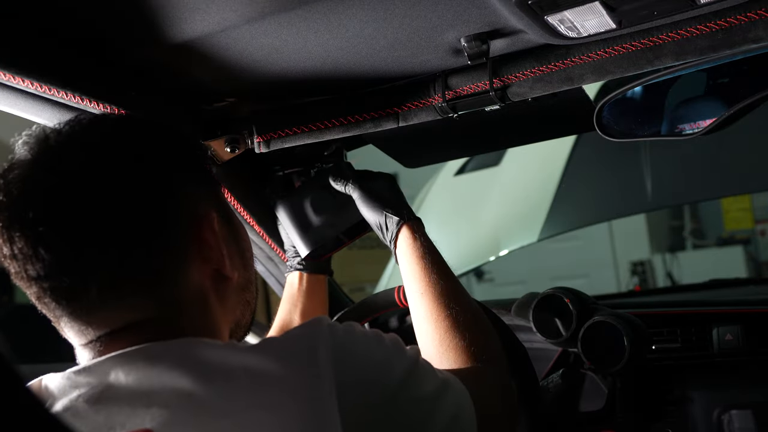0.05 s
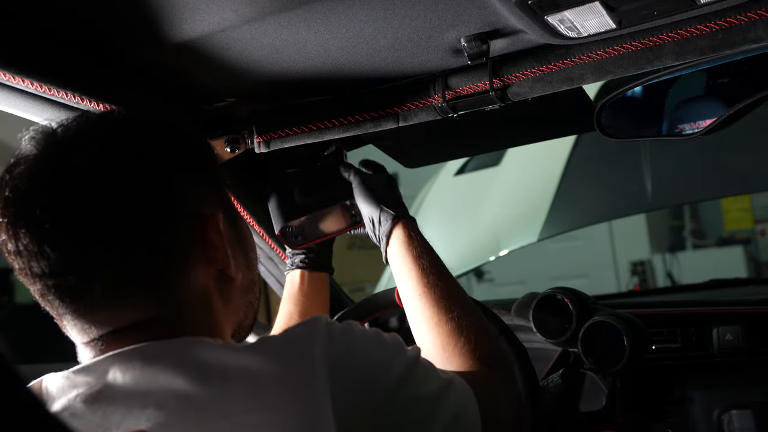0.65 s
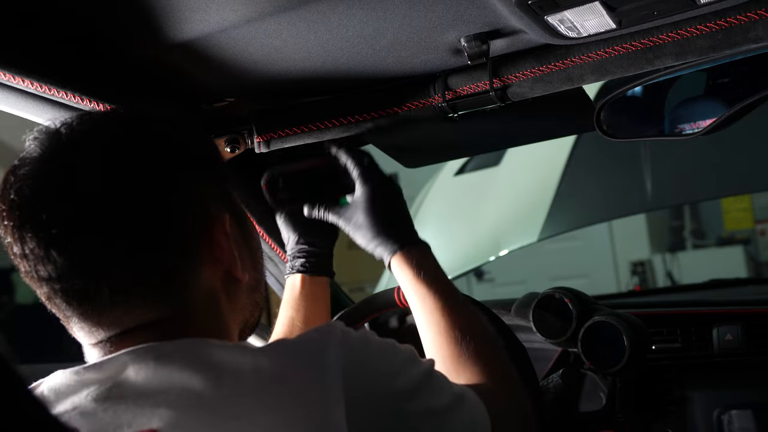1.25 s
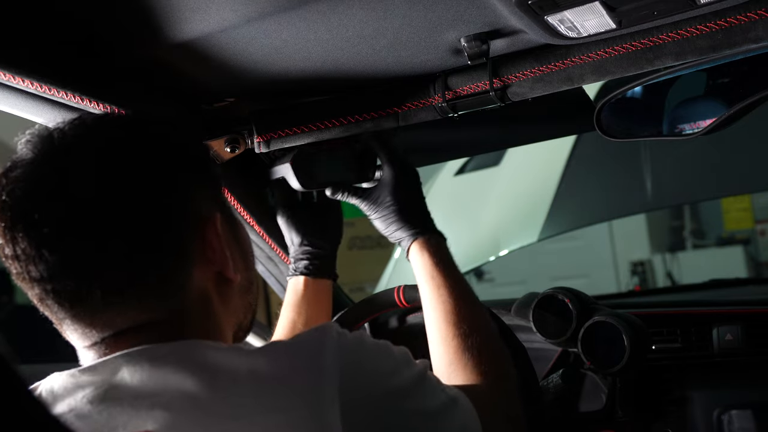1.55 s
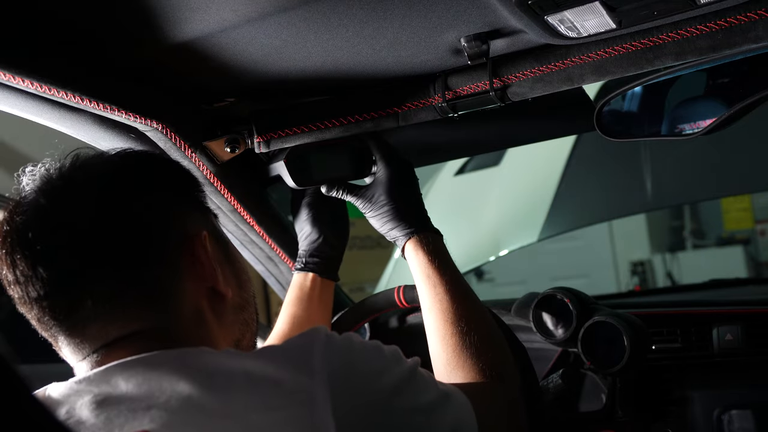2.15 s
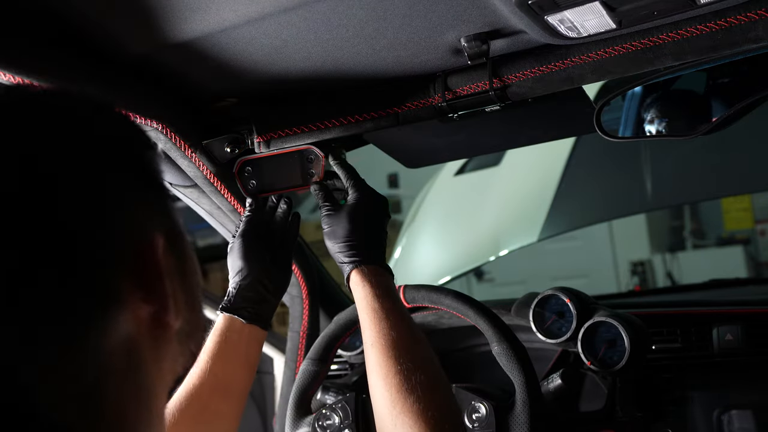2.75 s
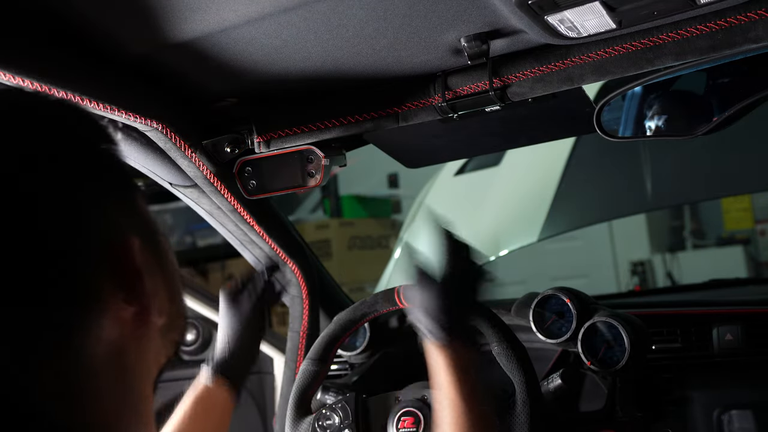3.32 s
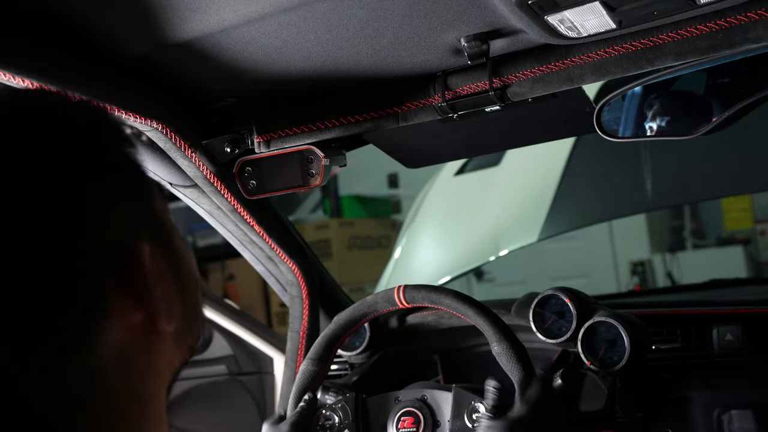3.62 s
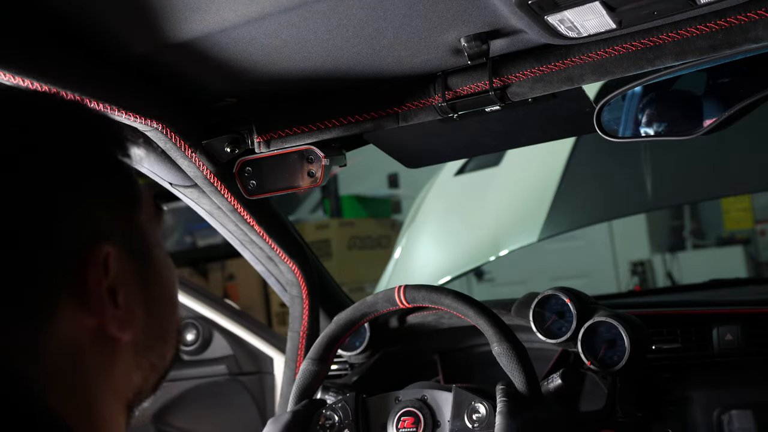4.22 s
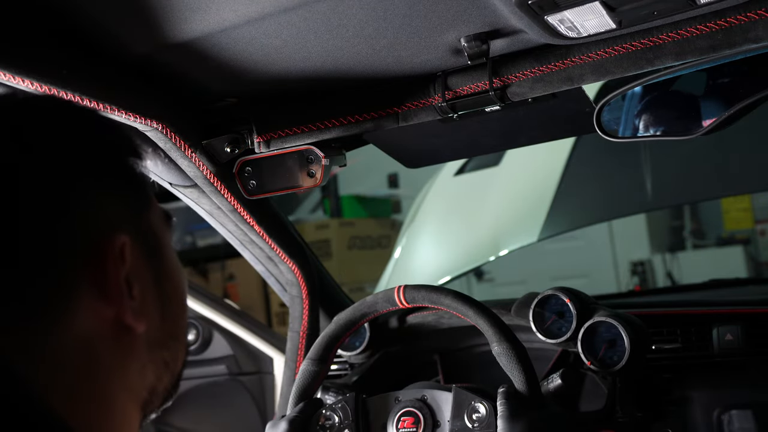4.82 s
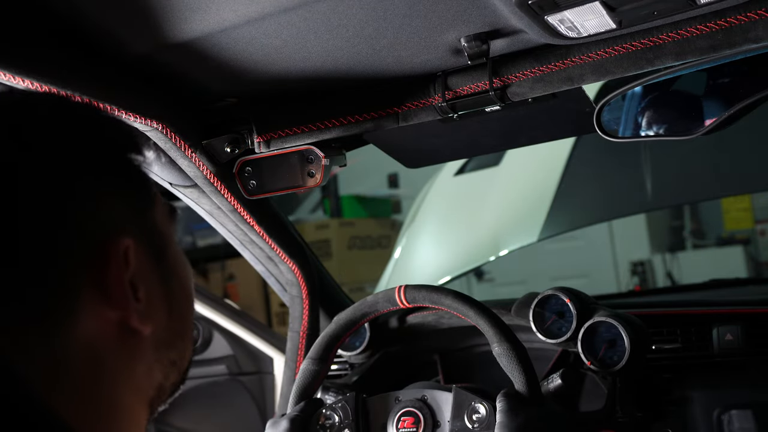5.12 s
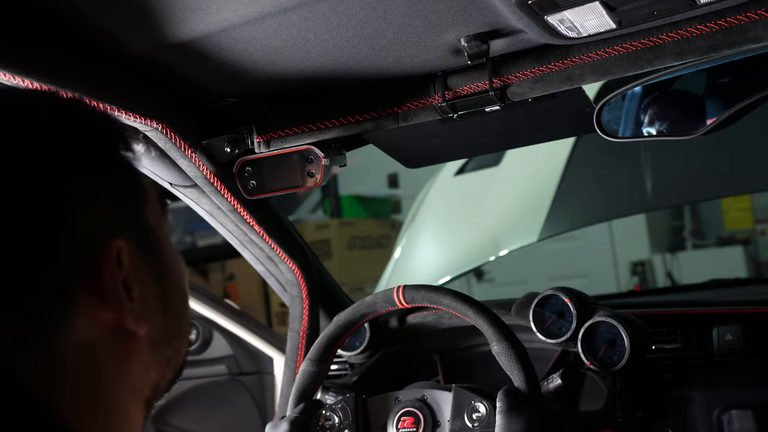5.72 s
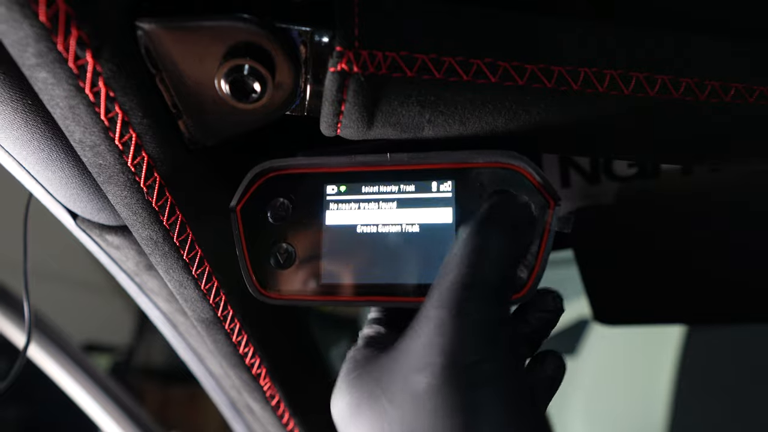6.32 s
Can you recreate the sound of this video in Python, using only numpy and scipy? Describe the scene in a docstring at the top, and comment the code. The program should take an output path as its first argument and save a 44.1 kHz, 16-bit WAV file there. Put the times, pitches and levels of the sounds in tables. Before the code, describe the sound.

Inside a quiet parked car, gloved hands work a small plastic device into a mount on a padded metal bar, with close, light clicks and dull thumps. It seats with a loud, boomy double knock. Sleeves swish faintly, and the hands land on the steering wheel and slide along it with small snaps and faint squeaks. Near the end a button clicks sharply.

```python
"""Inside a quiet parked car, gloved hands work a small timer into its mount on a padded metal bar.
The bar thumps and the plastic case clicks; just after 2 seconds it seats with a double knock
that makes the cabin air boom. At about 3.5 seconds sleeves swish and the hands drop to the
steering wheel, then slide on it with small snaps and faint squeaks.
Just after 6 seconds a button is pressed and clicks."""
import sys
import numpy as np
from scipy import signal
from scipy.fft import rfft, irfft, next_fast_len
from scipy.io import wavfile
from scipy.ndimage import uniform_filter1d

SR = 44100
rng = np.random.default_rng(int(sys.argv[2]) if len(sys.argv) > 2 else 0)


def inscribe(sig):
    """Save sig as 16-bit PCM at rate SR to the path in sys.argv[1].

    A 1-D sig is mono; a 2-D sig holds one channel per row.
    Samples are clipped to [-1, 1] before scaling.
    """
    pcm = np.round(np.clip(np.atleast_2d(sig).T, -1, 1) * 32767)
    wavfile.write(sys.argv[1], SR, pcm.astype(np.int16))


N = 280917
HIT_T = np.arange(SR // 2) / SR   # the clock of a single blow, in seconds
LAND_S = 3.585   # the hands reach the wheel

# Pushes on the mount, bar and wheel. Each row: start in seconds, relative bar level in dB,
# relative cabin boom level in dB, hardness in Hz (higher sounds brighter).
PUSHES = [(0.072, -46.5, -58, 347), (0.1616, -29.5, -55, 208), (0.187, -44, -48, 330),
          (0.197, -39, -49, 530), (0.283, -48, -59, 276), (0.365, -37.5, -45, 302),
          (0.376, -34.5, -47, 406), (0.395, -31, -43, 210), (0.510, -36, -65, 162),
          (0.544, -42, -52, 220.5), (0.709, -26.5, -42, 245), (0.7631, -27.5, -55, 497),
          (0.821, -44, -48, 218), (0.995, -32, -39.5, 188), (1.2228, -34.5, -47, 490),
          (1.238, -36.5, -49, 330), (1.383, -44, -48.5, 634), (1.502, -45.5, -43.5, 352),
          (1.571, -49, -61, 300), (1.682, -42.5, -43.5, 330), (1.749, -54, -67, 462), (2.09, -36, -46, 387),
          (2.108, -36, -29.5, 340), (2.172, -31, -22.5, 247), (2.184, -17.5, -53, 218),
          (2.2256, -24, -20, 330), (2.252, -19.5, -48, 252), (2.449, -46, -41, 280), (2.607, -50, -79, 240),
          (2.823, -50.5, -65, 192), (3.566, -52, -33, 380), (6.198, -43, -45.5, 262),
          (6.355, -34.5, -56, 336)]
# Heavy, soft bumps. Each row: start in seconds, first level in dB, seconds between rebounds,
# loss per rebound in dB.
SOFT_BUMPS = [(1.026, -41.5, 0.087, 0.5), (1.80, -46.5, 0.12, 1), (2.2386, -15.5, .152, 15),
              (3.63, -25, 0.092, 6), (4.262, -40, .063, 5), (6.011, -41, .068, 1.5)]
# Contacts that ring one note of the mount, case or wheel. Each row: start in seconds, level in dB,
# pitch in Hz, seconds to fade by 60 dB.
RINGING_CONTACTS = [(0.710, -28.5, 131.3, 0.34), (0.868, -44.5, 2700, 0.017), (1.221, -47, 3150, 0.052),
                    (2.108, -57.5, 2300, 0.076), (1.224, -31, 171.5, 0.09), (1.239, -28, 258, 0.033),
                    (2.1736, -23, 347, 0.029), (2.2257, -19.5, 325, 0.051), (2.227, -31.5, 532, 0.1),
                    (2.226, -40, 1385, 0.066), (4.171, -32.5, 168, 0.073), (4.238, -33.5, 426, 0.069),
                    (6.352, -55, 2590, 0.05)]
# The plastic case catching on the mount. Each row: start in seconds, level in dB, brightness in Hz,
# rattle length in seconds.
CASE_CATCHES = [(0.191, -50, 2370, 0.014), (0.373, -44.5, 6250, 0.0068), (0.411, -54.5, 5500, 0.0025),
                (0.752, -53, 8950, 0.00092), (0.762, -40.5, 4170, 0.0076), (0.8685, -44.5, 15000, 0.0017),
                (1.22, -44, 8500, 0.016), (1.2715, -47, 7500, 0.0033), (1.292, -57.5, 7000, 0.0036),
                (1.38, -42, 11100, 0.0096), (2.087, -59.5, 8260, 0.005), (2.105, -44.5, 10300, 0.012),
                (2.174, -48, 6040, 0.015), (2.179, -43.5, 15000, 0.013), (2.227, -42.5, 8750, 0.024),
                (2.244, -47, 15000, 0.006)]
# The grip snapping on the wheel, and a fingertip on the case. Each row: start in seconds,
# relative level of the hollow knock in dB, relative level of the sharp tick in dB.
GRIP_SNAPS = [(3.894, -60, -42), (3.9476, -30.5, -27.5), (3.959, -33.5, -36), (4.009, -24.5, -51),
              (4.038, -34.5, -37.5), (4.108, -31.5, -31.5), (4.167, -28.5, -29.5), (4.173, -28, -47),
              (4.233, -25.5, -28), (4.956, -57, -51), (6.350, -29, -70)]
# Small taps in the cabin. Each row: start in seconds, level in dB, brightness in Hz.
CABIN_TAPS = [(3.894, -39, 1320), (4.010, -34, 900), (4.437, -49, 1500), (4.953, -39, 1730),
              (4.961, -44.5, 1290), (5.245, -57, 760)]
# A rubber glove squeaking on the case. Each row: middle in seconds, relative level in dB,
# pitch in Hz, speed of the flutter in Hz, fade time on either side in seconds.
CASE_SQUEAKS = [(0.379, -49, 12100, 200, .008), (0.870, -52, 11000, 500, .004),
                (0.928, -49.5, 15200, 900, .016)]
# The gloves shifting their grip. Each row: loudest moment in seconds, relative level in dB.
GRIP_SHIFTS = [(0.06, -68), (0.17, -68), (0.25, -75), (0.4, -57), (0.775, -54), (0.9, -55.5), (1.29, -58.5),
               (1.41, -54.5), (1.96, -70), (2.24, -63)]
# Sleeves swishing as the arms drop. Each row: loudest moment in seconds, level in dB,
# rise in dB per second, fall in dB per second.
SLEEVE_SWISHES = [(3.41, -55.5, 81, 61), (3.573, -54, 404, 236), (3.88, -67, 83, 44)]
# A glove catching on the rim. Each row: time it reaches full level in seconds, relative level in dB,
# pitch in Hz, width in Hz, hold time in seconds.
RIM_SQUEAKS = [(3.573, -57, 1800, 260, 0.034), (3.735, -63, 2650, 300, 0.044),
               (4.75, -61.5, 1097, 45, 0.022), (4.854, -59.5, 1100, 50, 0.032),
               (4.822, -69, 1628, 45, 0.042), (4.98, -62, 1088, 60, 0.076), (5.14, -68.5, 2950, 910, 0.024),
               (5.18, -68.5, 1080, 70, 0.027)]

# Modes are the notes a thing rings at. Each row: pitch in Hz, width in Hz (wider dies sooner),
# relative level in dB.
BAR_MODES = [(132.3, 6.2, 7.5), (161.6, 33, -0.5), (188.2, 20.7, 2.5), (232.6, 15.4, -4.5),
             (257.5, 42, -23.5), (325.6, 9.4, -3.5), (387.3, 8.5, -6)]
BRACKET_MODES = [(367, 26, -1), (497, 50, -2), (654, 64, -1.5), (731, 23, -7.5), (856, 29, 0.5),
                 (1100, 100, -15.5), (1442, 22, 3)]
CABIN_AIR_MODES = [(54.8, 11.7, 12), (40.7, 21, -27), (96.5, 32, -2.5)]
CASE_MODES = [(737, 89, 8), (1417, 230, 0), (2020, 230, 5.5), (2700, 440, 3.5), (3220, 880, 1.5),
              (4550, 2700, -5.5), (7400, 1500, -2), (11100, 1100, -1), (15000, 680, 0)]
BUTTON_MODES = [(835, 78, -3), (1720, 550, -17), (2536, 46, 6), (3210, 92, 4.5), (3800, 180, 2),
                (4060, 210, 4), (4600, 410, 4), (4980, 220, 0), (5170, 200, -1), (5980, 180, 6),
                (7300, 400, -3), (8000, 280, -3), (8450, 360, -11), (10300, 700, -10), (11100, 520, -15),
                (14900, 2200, -24)]
HOLLOW_KNOCK_MODES = [(415, 300, -0.5), (735, 88, 5.5), (1037, 290, 6.5), (1405, 450, -0.5), (1596, 94, 2),
                      (2370, 1100, -3), (3520, 1600, -9.5)]
SHARP_TICK_MODES = [(3300, 1300, 0.5), (5500, 4100, -0.5), (7600, 3100, 0.5), (12100, 1400, 0.8),
                    (16300, 2900, -3.5)]
TAP_MODES = [(330, 330, -5), (833, 78, 1), (1080, 132, 6), (1300, 125, 5), (1560, 340, 0)]

# A colour says how much bass and treble a noise has. Each row: frequency in Hz, relative level in dB.
WHEEL_SHAKE_COLOUR = [(40, 0), (65, 4.5), (110, -9.5), (170, -16), (400, -27.5), (900, -63)]
BUTTON_TAIL_COLOUR = [(1200, -9), (2500, -5), (4500, 0), (7500, -6.5), (11000, -13), (16000, -15)]
GLOVE_RUSTLE_COLOUR = [(300, 0), (600, 9.5), (900, 8), (1200, -8.5), (1900, 3.5), (2800, -2), (5500, -2),
                       (8000, -6), (12000, -12), (16000, -0.5)]
SWISH_COLOUR = [(150, 4), (400, 8), (1100, 5), (2000, -4), (3500, -11), (8000, -20)]
RIM_BRUSH_COLOUR = [(800, -11), (1400, 0), (1850, -1), (2200, -2), (2750, 0), (3600, 1), (7500, 0.5),
                    (12000, -4.5), (16000, -7.5)]
RIM_SLIDE_COLOUR = [(53, -36.5), (90, -2), (266, -9), (393, 1), (568, -9.5), (1110, -7), (1540, -13.5),
                    (3510, -18.5), (4360, -23.5), (5900, -29), (13700, -33), (16000, -42)]
HUSH_COLOUR = [(15, -40), (25, -9), (64, -0.5), (157, -11), (185, -13.5), (242, -15), (317, -16.5),
               (439, -20.5), (641, -29), (1100, -28), (1790, -33), (2050, -31.5), (5730, -32.5),
               (14400, -31.5), (16000, -28)]

# Faint, steady electronic tones. Each row: pitch in Hz, level in dB.
WHINE_TONES = [(6751, -89), (7876, -89), (8253, -88), (8624, -89), (13501, -88), (14998, -89)]


def mount_thumps(bar_db, boom_db, knock_db):
    """Each push rings the padded bar, the bracket and the cabin air; soft pushes sound duller."""
    out = np.zeros(N)
    firm_hz, knock_db_per_octave = 300, 13   # a harder push rattles the bracket more
    for s, push_db, air_db, hard_hz in PUSHES:
        push = contact(early_db=-9, early_t60=.09, late_db=-12, late_t60=.45)
        rap = contact(early_db=-2, early_t60=.06, late_db=-9, late_t60=.35)
        bar = resonate(low_pass(push, hard_hz, order=3), BAR_MODES, sign=1)
        bracket = resonate(low_pass(rap, 600 + hard_hz, order=5), BRACKET_MODES, sign=1)
        rattle_db = push_db + knock_db_per_octave * np.log2(hard_hz / firm_hz)
        add_blow(out, s, push_db + bar_db, bar)
        add_blow(out, s, rattle_db + knock_db, bracket)
        add_blow(out, s, air_db + boom_db, cabin_boom(soft_hz=107))
    return out


def cabin_boom(soft_hz):
    """The air in the cabin rings at its lowest notes after a soft push."""
    push = contact(early_db=-14, early_t60=.2, late_db=-11, late_t60=.8)
    return resonate(low_pass(push, soft_hz), CABIN_AIR_MODES, sign=1)


def bumps(push_s):
    """The mount seating home and arms landing on the wheel: soft pushes that rebound and die away."""
    out = np.zeros(N)
    push = np.sin(np.pi * np.minimum(HIT_T / push_s, 1)) ** 2
    sway = resonate(push, CABIN_AIR_MODES)
    for start, first_db, step_s, loss_db in SOFT_BUMPS:
        for s, db in series(start, first_db, step_s, -loss_db, count=4):
            add_blow(out, s, db, sway)
    return out


def clunks():
    """Each contact rings one note, slightly blurred by reflections."""
    out = np.zeros(N)
    for s, db, hz, t60 in RINGING_CONTACTS:
        ring = np.sin(2 * np.pi * hz * HIT_T) * from_db(-60 * HIT_T / t60)
        reflections = contact(early_db=-10, early_t60=.08, late_db=-18, late_t60=.35)
        add_blow(out, s, db, signal.fftconvolve(ring, reflections)[:len(HIT_T)])
    return out


def case_clicks(slips_per_s, slip_size):
    """Plastic catches, then stutters through smaller slips; each spot favours different notes."""
    out = np.zeros(N)
    # The case also judders along the mount in four even catches, each a little firmer.
    judder_hz, judder_length_s = 7000, .001
    catches = series(s=0.8002, db=-50.5, step_s=0.0222, step_db=1.5, count=4)
    judder = [(s, db, judder_hz, judder_length_s) for s, db in catches]
    for s, db, bright_hz, length_s in CASE_CATCHES + judder:
        slipping = rng.random(len(HIT_T)) < slips_per_s / SR
        slips = slip_size * slipping * rng.standard_normal(len(HIT_T))
        stutter = (HIT_T == 0) + slips * np.exp(-(HIT_T / length_s) ** 2)
        reflections = contact(early_db=5, early_t60=0.036, late_db=-6, late_t60=0.25)
        rattle = signal.fftconvolve(stutter, reflections)[:len(HIT_T)]
        modes = [(hz, width, level + rng.normal(0, 2)) for hz, width, level in CASE_MODES]
        add_blow(out, s, db, low_pass(resonate(rattle, modes), bright_hz))
    return out


def button_press(s, ring_db):
    """The switch dome snaps through with a crack and rings the small case; a faint tail follows."""
    out = np.zeros(N)
    crack_db, tail_db, tail_t60 = -10.5, -32.5, 0.41   # levels are relative to the ring
    snap = contact(early_db=-6.5, early_t60=0.03, late_db=-40, late_t60=0.13)
    ring = peak_one(resonate(snap, BUTTON_MODES))
    crack = from_db(crack_db) * peak_one(resonate(HIT_T == 0, [(7560, 4500, 0)]))
    tail = noise(BUTTON_TAIL_COLOUR)[:len(HIT_T)] * from_db(tail_db - 60 * HIT_T / tail_t60)
    add(out, s, from_db(ring_db) * (crack + ring + tail))
    return out


def grip_snaps(hollow_db, tick_db):
    """The grip snaps: a dry, hollow knock with a sharp tick on top."""
    out = np.zeros(N)
    for s, hollow, tick in GRIP_SNAPS:
        knock = contact(early_db=-1, early_t60=.04, late_db=-12, late_t60=.2)
        crack = contact(early_db=7.5, early_t60=0.039, late_db=-5, late_t60=0.49)
        add_blow(out, s, hollow + hollow_db, resonate(low_pass(knock, hz=2300), HOLLOW_KNOCK_MODES))
        add_blow(out, s, tick + tick_db, resonate(crack, SHARP_TICK_MODES))
    return out


def taps():
    """Short, round, dry knocks with little treble."""
    out = np.zeros(N)
    for s, db, bright_hz in CABIN_TAPS:
        knock = contact(early_db=5, early_t60=0.052, late_db=-9.5, late_t60=0.4)
        add_blow(out, s, db, resonate(low_pass(knock, bright_hz), TAP_MODES))
    return out


def wheel_shake():
    """The weight of the arms shakes the wheel as they land, and again as the sliding hand stops."""
    lean = swell(LAND_S, db=-43, hold_s=0.3, rise_db_per_s=800, fall_db_per_s=143)
    settle = swell(s=4.3, db=-42.5, hold_s=0, rise_db_per_s=62, fall_db_per_s=134)
    return (lean + settle) * noise(WHEEL_SHAKE_COLOUR)


def case_squeaks(level_db):
    """Rubber sticks and slips on the case, making brief, very high chirps."""
    out, t = np.zeros(N), np.arange(N) / SR
    for s, db, hz, flutter_hz, fade_s in CASE_SQUEAKS:
        flutter = rms_one(low_pass(rng.standard_normal(N), flutter_hz))
        loudness = from_db(db + level_db) * np.exp(-((t - s) / fade_s) ** 2)
        out += loudness * flutter * np.sin(2 * np.pi * hz * t)
    return out


def glove_rustle(level_db):
    """Gloves rub faintly while they hold the case, and louder whenever the grip shifts."""
    holding = swell(s=0, db=-74.5, hold_s=1.74, rise_db_per_s=0, fall_db_per_s=25)
    shifts = sum(swell(s, db, hold_s=0, rise_db_per_s=300, fall_db_per_s=134) for s, db in GRIP_SHIFTS)
    rub = coloured(friction(slips_per_s=3000, spread_db=3.5, hiss=0.46), GLOVE_RUSTLE_COLOUR)
    return from_db(level_db) * (holding + shifts) * rub


def sleeve_swishes():
    """Sleeves swish as the arms drop."""
    loudness = sum(swell(s, db, 0, rise, fall) for s, db, rise, fall in SLEEVE_SWISHES)
    return loudness * noise(SWISH_COLOUR)


def rim_rubbing():
    """The gloves brush the rim, one hand slides along it, and a last light stroke follows."""
    brush = swell(LAND_S, db=-58.5, hold_s=0.086, rise_db_per_s=330, fall_db_per_s=68)
    brush *= noise(RIM_BRUSH_COLOUR)
    slide = swell(s=4.04, db=-42.5, hold_s=.17, rise_db_per_s=195, fall_db_per_s=204)
    slide *= coloured(friction(slips_per_s=2200, spread_db=2.5, hiss=0.52), RIM_SLIDE_COLOUR)
    stroke = swell(s=4.85, db=-66.5, hold_s=0.28, rise_db_per_s=37, fall_db_per_s=66)
    dull_rub = low_pass(rng.standard_normal(N), hz=660)
    stroke *= rms_one(resonate(dull_rub, [(300, 87, 0)]))
    return brush + slide + stroke


def rim_squeaks(level_db):
    """A sliding glove catches on the rim and makes one thin, wavering note sing."""
    out = np.zeros(N)
    for s, db, hz, width, hold_s in RIM_SQUEAKS:
        mode = [(hz, width, 0)]
        note = rms_one(resonate(resonate(rng.standard_normal(N), mode), mode))
        out += swell(s, db + level_db, hold_s, rise_db_per_s=200, fall_db_per_s=200) * note
    return out


def cabin_hush(noise_db):
    """The still cabin, with the hiss and faint whine of electronics."""
    t = np.arange(N) / SR
    whine = sum(from_db(db) * np.sqrt(2) * np.sin(2 * np.pi * hz * t) for hz, db in WHINE_TONES)
    return from_db(noise_db) * noise(HUSH_COLOUR) + whine


def contact(early_db, early_t60, late_db, late_t60):
    """One sharp pulse, its reflections off the glass close by, and a late tail."""
    early = from_db(early_db) * dying_noise(early_t60)
    late = from_db(late_db) * dying_noise(late_t60)
    return (HIT_T == 0) + early + late


def dying_noise(t60):
    """A burst of noise with energy 1 that fades by 60 dB in t60 seconds."""
    x = rng.standard_normal(len(HIT_T)) * from_db(-60 * HIT_T / t60)
    return x / np.linalg.norm(x)


def friction(slips_per_s, spread_db, hiss):
    """Tiny slips of uneven size over a smooth hiss."""
    slips = (rng.random(N) < slips_per_s / SR) * rng.choice([-1, 1], N)
    sizes = from_db(spread_db * np.minimum(rng.exponential(1, N), 4))
    return rms_one(slips * sizes) + hiss * rng.standard_normal(N)


def resonate(x, modes, sign=-1):
    """Ring all the modes; sign=-1 fills the gaps between their notes, sign=1 starts sharply."""
    out = 0
    for k, (hz, width, db) in enumerate(modes):
        decay = np.exp(-np.pi * width / SR)
        poles = [1, -2 * decay * np.cos(2 * np.pi * hz / SR), decay ** 2]
        gain = sign ** k * from_db(db) * (1 - decay ** 2) / 2
        out = out + gain * signal.lfilter([1, 0, -1], poles, x + 1e-18)
    return out


def coloured(x, colour):
    """Give a noise a colour and an average level (rms) of 1."""
    hz, db = np.transpose(colour)
    size = next_fast_len(N)
    f = np.maximum(np.arange(size // 2 + 1) * SR / size, 1)
    gain = from_db(np.interp(np.log(f), np.log(hz), db))
    bass_fade = np.minimum(f / hz[0], 1) ** 2
    return rms_one(irfft(rfft(x, size) * gain * bass_fade, size)[:N])


def noise(colour):
    return coloured(rng.standard_normal(N), colour)


def swell(s, db, hold_s, rise_db_per_s, fall_db_per_s):
    """A loudness curve that reaches its level at time s, holds, and fades."""
    t = np.arange(N) / SR - s
    return from_db(db - rise_db_per_s * np.maximum(-t, 0) - fall_db_per_s * np.maximum(t - hold_s, 0))


def series(s, db, step_s, step_db, count):
    """Times and levels of evenly spaced contacts that grow or fade steadily."""
    return [(s + k * step_s, db + k * step_db) for k in range(count)]


def low_pass(x, hz, order=2):
    return signal.sosfilt(signal.butter(order, min(hz, SR * 9 / 20), fs=SR, output="sos"), x)


def from_db(db):
    return 10 ** (np.asarray(db) / 20)


def rms_one(x):
    return x / np.sqrt(np.mean(x ** 2) + 1e-20)


def peak_one(x, size=176):
    """Scale a blow so that its loudest four milliseconds have an average level (rms) of 1."""
    return x / np.sqrt(uniform_filter1d(x ** 2, size).max() + 1e-20)


def add(track, s, sound):
    """Lay a sound into the track at time s."""
    at = int(np.clip(round(s * SR), 0, N - 1))
    track[at:at + len(sound)] += sound[:N - at]


def add_blow(track, s, db, sound):
    """Lay a blow into the track with its loudest part at the given level."""
    add(track, s, from_db(db) * peak_one(sound))


def scene():
    """The mount, the hands on the wheel and the button, over the hush of the cabin."""
    mount = mount_thumps(bar_db=1.5, boom_db=3.0, knock_db=-12.0)
    case = case_clicks(slips_per_s=1500, slip_size=0.4) + case_squeaks(level_db=3.0)
    grip = grip_snaps(hollow_db=-5.5, tick_db=-5.5) + glove_rustle(level_db=-3.0)
    hands = sleeve_swishes() + rim_rubbing() + taps() + rim_squeaks(level_db=-4.5)
    jolts = bumps(push_s=.018) + wheel_shake() + clunks()
    button = button_press(s=6.1949, ring_db=-21)
    return (mount + case + grip + hands + jolts + button + cabin_hush(noise_db=-61))[None]


def record(dry):
    """Take away the deepest bass and cut the very highest treble steeply."""
    low_cut_hz, high_cut_hz = 39, 15900
    bass_cut = signal.butter(3, low_cut_hz, "high", fs=SR, output="sos")
    treble_cut = signal.ellip(12, .1, 80, high_cut_hz, fs=SR, output="sos")
    return signal.sosfilt(treble_cut, signal.sosfilt(bass_cut, dry))


dry = scene()
out = record(dry)
inscribe(out)
```